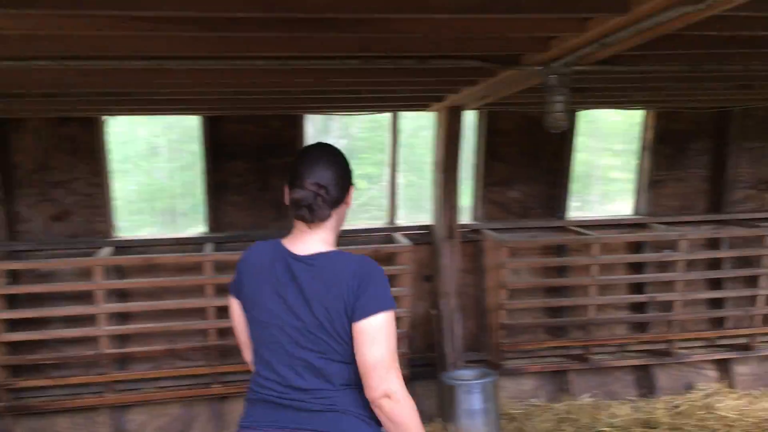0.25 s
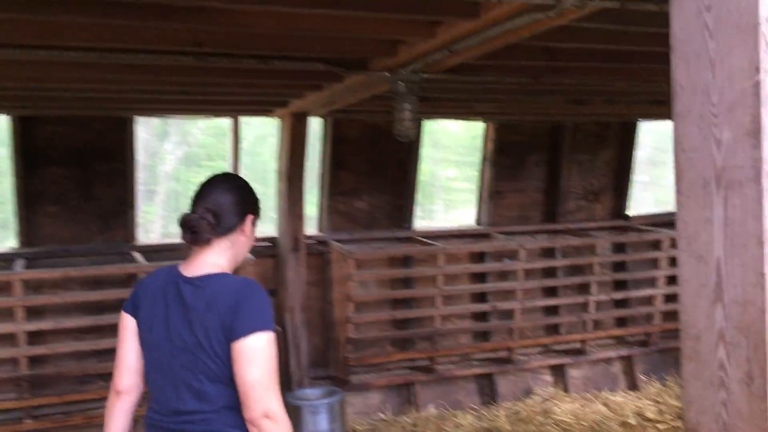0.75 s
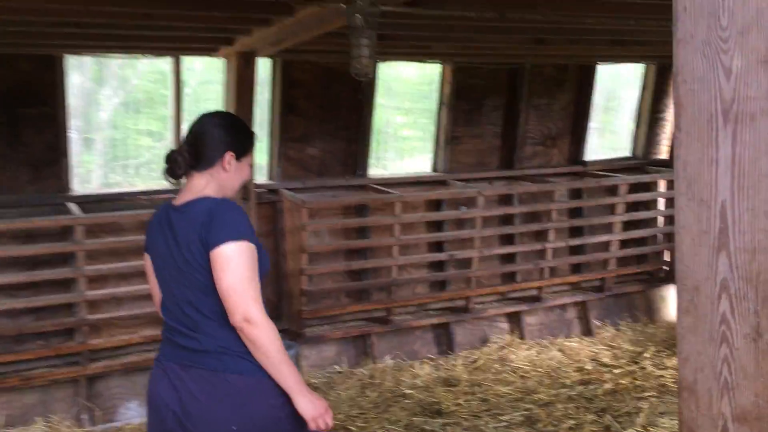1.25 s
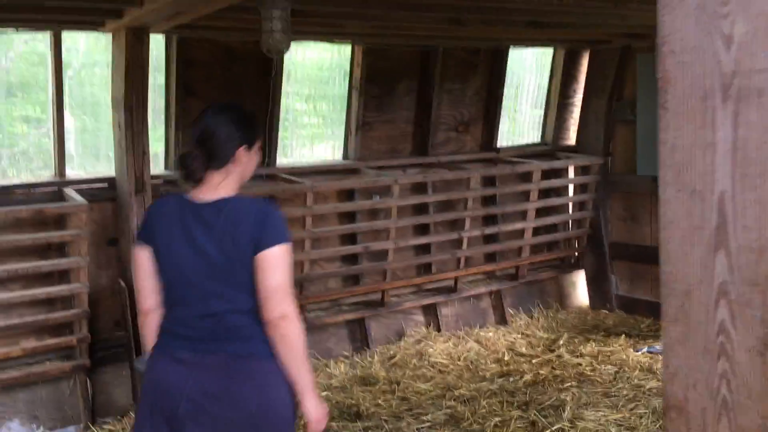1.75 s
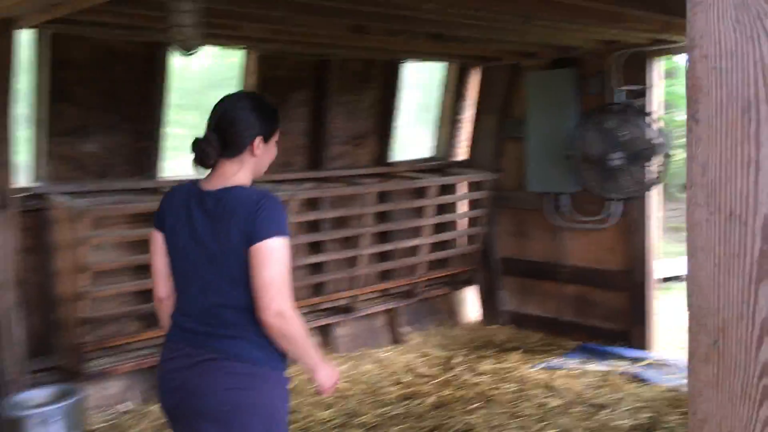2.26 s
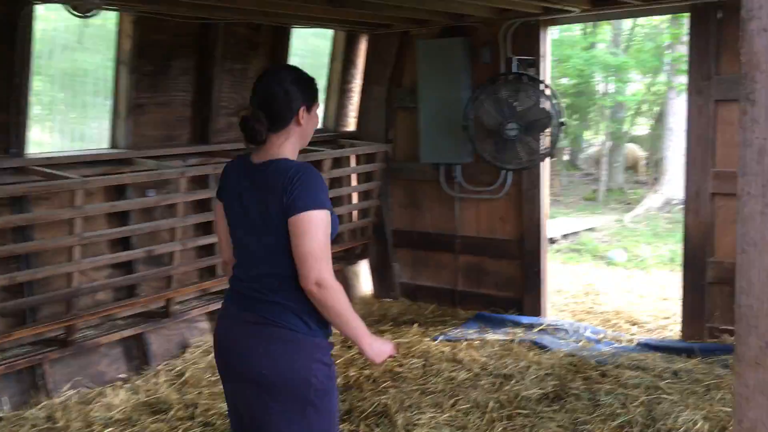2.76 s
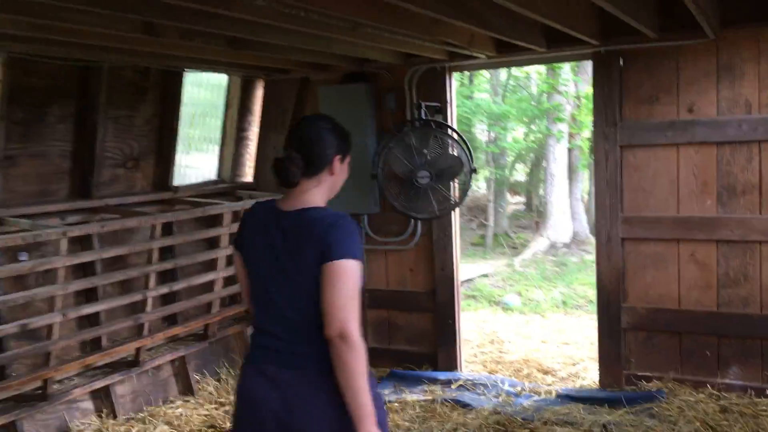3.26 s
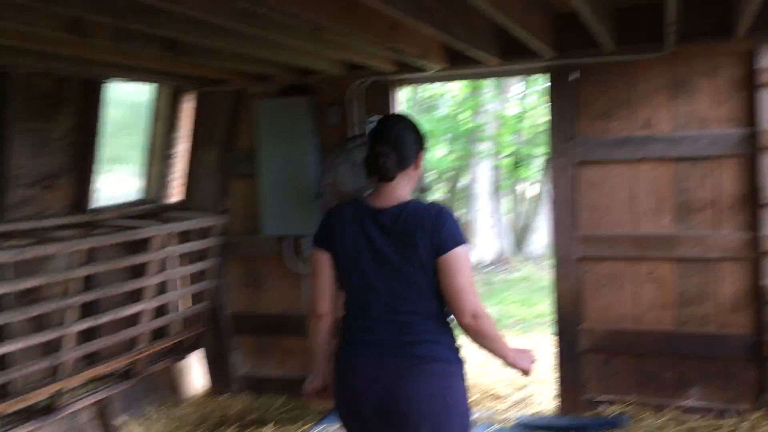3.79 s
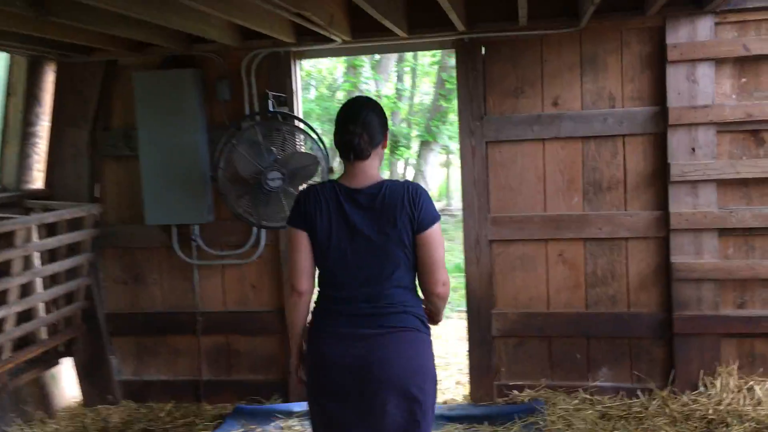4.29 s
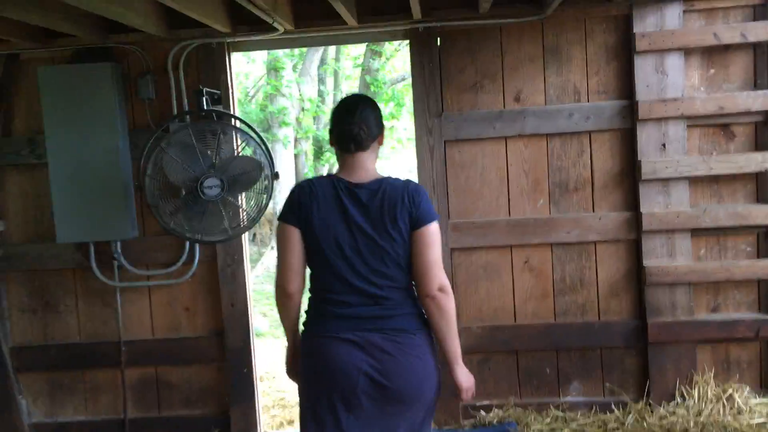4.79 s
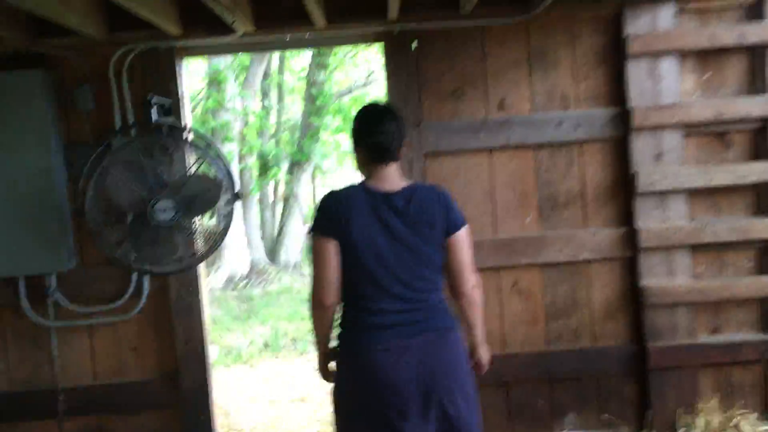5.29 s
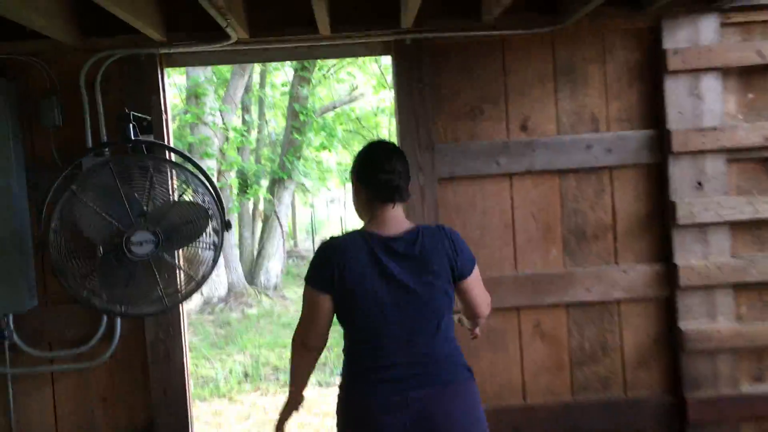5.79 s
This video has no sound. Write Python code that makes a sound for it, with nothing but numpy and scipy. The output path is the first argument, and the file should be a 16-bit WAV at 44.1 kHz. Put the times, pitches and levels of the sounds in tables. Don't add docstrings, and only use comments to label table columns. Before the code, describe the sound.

A handheld microphone is walked through straw toward a large running fan. The low beating hum dominates, gradually slowing, over soft rumble and faint air hiss. Thin metallic guard rattle rises before the middle and then fades. Bright straw swishes come and go, strongest at the start and around three seconds, with crisp stalk snaps and a late dull heel scuff.

```python
import sys
import numpy as np
from scipy import signal
from scipy.fft import rfft, irfft
from scipy.io import wavfile

SR = 44100
rng = np.random.default_rng(int(sys.argv[2]) if len(sys.argv) > 2 else 0)


def generate_wav(signal):
    frames = np.transpose(np.atleast_2d(signal))
    scaled = np.clip(frames, -1, 1) * 32767
    pcm = np.round(scaled).astype(np.int16)
    wavfile.write(sys.argv[1], SR, pcm)


def voltage_ratio(level):
    return 10 ** (np.asarray(level, float) / 20)


N = 266275
TIME_S = np.arange(N) / SR


def unit_rms(x):
    return x / np.sqrt(np.mean(x ** 2) + 1e-20)


def curve(table):
    t_s, value = np.transpose(table)
    return np.interp(TIME_S, t_s, value)


def drift(rate_hz):
    hop = 40
    pole = np.exp(-2 * np.pi * hop * rate_hz / SR)
    noise = rng.standard_normal(N // hop + 2002)
    slow = signal.lfilter([1], [1, -2 * pole, pole ** 2], noise)[2000:]
    return np.interp(np.arange(N) / hop, np.arange(len(slow)), unit_rms(slow))


def coloured(x, spectrum):
    hz, db = np.transpose(spectrum)
    bins_hz = np.arange(N // 2 + 1) * SR / N + 1
    gain = voltage_ratio(np.interp(np.log(bins_hz), np.log(hz), db))
    return unit_rms(irfft(rfft(x) * gain, N))


def bandpass(x, edges_hz):
    return signal.sosfilt(signal.butter(2, edges_hz, "band", fs=SR, output="sos"), x)


def resonance(x, hz, width_hz):
    r = np.exp(-np.pi * width_hz / SR)
    top = [(1 - r * r) / 2, 0, (r * r - 1) / 2]
    return signal.lfilter(top, [1, -2 * r * np.cos(2 * np.pi * hz / SR), r * r], x)


# t/s, turn rate f/Hz
FAN_SPEED = [(0.0, 21.396), (1.0, 21.146), (2.0, 20.824), (2.5, 20.768), (3.0, 20.606), (4.0, 20.039),
             (4.5, 19.844), (5.0, 19.665), (5.5, 19.5), (6.04, 19.464)]


def fan_angle():
    return 4.237 + 2 * np.pi * np.cumsum(curve(FAN_SPEED)) / SR


# extra path/m at start, its rate/(m/s), bend/(m/s^2), share of direct
ECHOES = [(3.156, -1.943, 0.297, 0.146), (5.134, -0.592, 0.136, 1.011), (7.622, -1.836, 0.374, 0.244),
          (9.205, 0.508, 0.143, 0.215), (9.337, 0.89, 0.032, 0.667), (11.54, -3.139, 0.354, 0.181),
          (13.955, 0.286, 0.107, 0.49), (14.803, 0.18, 0.123, 0.43), (16.172, -0.188, 0.138, -0.274),
          (16.557, -1.263, 0.223, 0.558), (16.744, 0.05, 0.063, 0.185), (19.786, -1.871, 0.141, -0.108),
          (21.162, -0.121, -0.083, -0.298), (24.474, -1.575, 0.274, 0.499), (25.239, 1.158, 0.043, -0.843),
          (27.879, -0.139, 0.253, 0.328), (28.074, -1.206, 0.159, -0.211), (29.02, 0.225, 0.147, 0.913),
          (30.504, -0.161, 0.185, 0.929), (31.499, 6.039, -0.511, 0.056), (32.009, -1.054, 0.331, 0.461),
          (32.315, -1.052, 0.276, -0.775), (35.386, -0.507, 0.08, -0.636), (36.825, 0.257, 0.1, -0.954),
          (44.808, 1.66, 0.082, -0.13), (44.98, 0.599, 0.112, -0.901), (45.207, 0.549, 0.126, 0.613),
          (46.31, 0.321, 0.145, -0.99), (46.557, 0.58, 0.2, 0.088), (51.838, -1.117, 0.301, 0.252)]


def barn(order):
    sound_m_per_s = 343
    t_s = np.arange(0, N + 441, 441) / SR
    path_m, speed, bend, share = np.transpose(ECHOES)[:, :, None]
    hz = order * np.interp(t_s, *np.transpose(FAN_SPEED))
    extra_m = path_m + speed * t_s + bend * t_s ** 2
    echoes = share * np.exp(-2j * np.pi * hz * extra_m / sound_m_per_s)
    return np.interp(TIME_S, t_s, 1 + np.sum(echoes, axis=0))


# order, level/dB at start, change/(dB/s)
FAN_ORDERS = [(2.0, -55.7, -0.8), (3.0, -40.6, -5.5), (4.0, -31.1, -1.9), (5.0, -36.1, 2.2),
              (6.0, -50.2, 4.0), (7.0, -38.1, -0.7), (8.0, -59.0, 1.6), (9.0, -62.3, 4.2),
              (10.0, -76.7, 3.4), (11.0, -69.1, 2.9), (12.0, -72.2, 4.0), (13.0, -66.4, 1.6),
              (14.0, -73.7, 3.4), (15.0, -80.4, 0.1), (16.0, -73.0, 1.9)]
# order, level/dB
TOP_ORDERS = [(17, -67), (18, -67), (19, -73), (20, -75), (21, -80)]


def fan_drone(angle):
    in_view_s, hidden_db = 2.75, -7.5
    far_shake, near_shake = .18, .04
    lag_rad, spread_rad, skew_rad = -2.762, 2.634, 1.329
    hidden = 1 / (1 + (TIME_S / in_view_s) ** 5)
    unsteady = near_shake + (far_shake - near_shake) * hidden
    sizes = {}
    for order, db, db_per_s in FAN_ORDERS:
        tilt_db = 0.2 + 0.01 * (order - 6.5)
        sizes[order] = voltage_ratio(tilt_db + db + db_per_s * TIME_S) * barn(order)
    for order, db in TOP_ORDERS:
        sizes[order] = voltage_ratio(db + hidden_db * hidden + 1.8 * drift(.8))
    out = np.zeros(N)
    for order, size in sizes.items():
        shake = unsteady * (order / 5) ** .5 * (drift(7) + 1j * drift(7))
        off = order - 5
        phase = lag_rad + spread_rad * off ** 2 / 2 + skew_rad * off ** 3 / 6
        wave = size * (1 + shake) * np.exp(1j * (order * angle + phase))
        out += np.sqrt(2) * wave.real
    return out * np.minimum(TIME_S / .012, 1)


# t/s, level/dB
RATTLE_LEVEL = [(0, -66.5), (.5, -63), (1, -63.5), (1.4, -63), (1.7, -60.5), (1.95, -58), (2.15, -62),
                (2.42, -57), (2.7, -61.5), (2.87, -61), (3.1, -62.5), (3.5, -64), (3.8, -65), (4.1, -70.5),
                (6.04, -73.5)]
# f/Hz, level/dB
GUARD_SPECTRUM = [(410, 3.5), (450, -9), (580, -10.5), (620, -4), (700, -4), (790, -2), (855, -2.5),
                  (950, -7), (1150, -4), (1400, -8.5)]


def guard_rattle(angle):
    hz, db = np.transpose(GUARD_SPECTRUM)
    turn_hz = np.mean(np.diff(angle[:N // 2])) * SR / (2 * np.pi)
    lines = np.zeros(N)
    for order in range(20, 50):
        size = voltage_ratio(np.interp(order * turn_hz, hz, db) + 3.5 * drift(1.8))
        lines += size * np.cos(order * angle + 1.3 * drift(2.5))
    gate = voltage_ratio(0.94 * np.cos(angle) + 1.9 * np.cos(2 * angle))
    outline = [(300, -8)] + GUARD_SPECTRUM + [(2000, -28)]
    bursts = coloured(gate * rng.standard_normal(N), outline)
    return voltage_ratio(curve(RATTLE_LEVEL)) * unit_rms(unit_rms(lines) + .85 * bursts)


# f/Hz, level/dB
AIR_SPECTRUM = [(260, -0.5), (450, 2), (700, -2.5), (1080, 0), (1850, -22.5), (4000, -14.5), (4850, -14.5),
                (6100, -5), (7700, -14.5), (9500, -12), (10500, -36), (11500, -24), (16500, -22.5)]


def air_hiss():
    return voltage_ratio(-67.5) * coloured(rng.standard_normal(N), AIR_SPECTRUM)


# f/Hz, level/(dB per Hz)
RUMBLE_SPECTRUM = [(30, -23), (50, -14), (70, -9), (95, 0), (135, -2), (160, -9), (200, -13), (260, -18),
                   (330, -24), (450, -33), (600, -45)]


def air_rumble():
    return voltage_ratio(-50.5) * coloured(rng.standard_normal(N), RUMBLE_SPECTRUM)


# t/s, peak level/dB, rise/s, fall/s (over 20 dB)
DRAGS = [(0.153, -53, 0.018, 0.09), (0.192, -55.5, 0.34, 0.57), (0.382, -54.5, 0.12, 0.02),
         (0.713, -57, 0.13, 0.72), (1.108, -59.5, 0.21, 0.12), (1.334, -58.5, 0.086, 0.19),
         (1.506, -60.5, 0.054, 0.2), (1.582, -59.5, 0.04, 0.5), (1.91, -63.5, 0.03, 0.6),
         (2.044, -58.5, 0.11, 0.45), (2.231, -60, 0.14, 0.03), (2.529, -59.5, 0.29, 0.5),
         (3.003, -51, 0.23, 0.27), (3.203, -54, 0.048, 0.08), (3.483, -56.5, 0.48, 0.1),
         (3.582, -58, 0.093, 0.1), (3.753, -55.3, 0.18, 0.13), (3.896, -59.6, 0.6, 0.15),
         (4.1, -58, 0.17, 0.29), (4.459, -58.5, 0.24, 0.67), (4.523, -56, 0.1, 0.25),
         (4.679, -67, 0.018, -0.6), (4.982, -62, 0.014, 0.1), (5.073, -59, 0.022, 0.23),
         (5.256, -60.5, 0.41, 0.56), (5.63, -59.5, 0.051, 0.2), (5.814, -62.5, 0.03, 0.39),
         (5.95, -62, 0.12, 0.05)]


def stirring_db():
    settling_db = -79.5
    power = voltage_ratio(2 * settling_db)
    for t_s, db, rise_s, fall_s in DRAGS:
        side_s = np.maximum(np.where(TIME_S < t_s, rise_s, fall_s), .015)
        power = power + voltage_ratio(2 * db - 40 * ((TIME_S - t_s) / side_s) ** 2)
    return 10 * np.log10(power)


# f/Hz, level/dB
BRIGHT_SPECTRUM = [(3000, -62), (4000, -60), (4900, -2.5), (5600, 3), (6250, 3.5), (7650, 0), (9000, 2),
                   (10100, 1), (10500, -1.5), (11200, 2.5), (14700, 4.5), (16500, -4.5)]


def straw_swish():
    draught_s, draught_width_s, draught_db, lee_db_per_s = 3.16, 1, 3, -0.33
    cracks_per_s = 2500
    swish_db = stirring_db()
    past_s = TIME_S - draught_s
    dull_db = -64.5 + 0.33 * (swish_db + 57.5)
    dull_db += draught_db * np.exp(-(past_s / draught_width_s) ** 2) + lee_db_per_s * past_s
    sizes = voltage_ratio(6.4 * np.minimum(rng.exponential(1, N), 5)) * rng.choice([-1, 1], N)
    struck = rng.random(N) < cracks_per_s * voltage_ratio(4.0 * drift(40)) / SR
    rub = 0.38 * unit_rms(sizes * struck) + voltage_ratio(1.1 * drift(24)) * rng.standard_normal(N)
    dull = unit_rms(bandpass(rub, [1200, 3900]))
    return voltage_ratio(swish_db) * coloured(rub, BRIGHT_SPECTRUM) + voltage_ratio(dull_db) * dull


# t/s, peak level/dB, f/Hz, width/octaves, decay/ms
STALK_SNAPS = [(.1608, -43, 6500, 1.8, .6), (.1688, -42, 6500, 1.8, .6), (.2177, -42, 9000, 2.2, .6),
               (.4907, -48, 1750, .4, 4.0), (.1650, -48, 3200, 1.4, 6.0), (4.06, -54, 1600, .8, 9.0),
               (4.37, -55, 1400, .9, 9.0), (.659, -52, 2700, .5, 3.0), (1.5732, -35.5, 6000, 2.6, .4),
               (3.0375, -40, 12000, 1.5, .8), (5.4912, -33.5, 6000, 2.6, .4),
               (4.6775, -34.5, 14800, .3, .5), (4.9797, -37, 7000, 2.4, .3), (5.0690, -47, 13000, 1.5, 8.0),
               (5.2285, -52, 2600, 1.2, 4.0), (5.3487, -46, 3000, 2.2, .8), (5.4478, -47, 8000, 2.2, .4),
               (5.6255, -47, 1900, .7, 6.0), (5.6262, -44, 3800, 1.6, 5.0), (5.6600, -47, 4200, .8, 5.0)]


def stalk_snaps():
    out, after_s = np.zeros(N), np.arange(900) / SR
    for t_s, db, hz, octaves, decay_ms in STALK_SNAPS:
        edges_hz = np.clip(hz * 2 ** (np.array([-.5, .5]) * octaves), 200, .4 * SR)
        noise = rng.standard_normal(len(after_s))
        push = (.4 * noise - (after_s == 0)) * np.exp(-1000 * after_s / decay_ms)
        crack = bandpass(push, edges_hz)
        start = round(t_s * SR)
        out[start:start + len(after_s)] += voltage_ratio(db) * crack / np.abs(crack).max()
    return out


# t/s, order, peak level/dB, half length/s (over 20 dB)
WIRE_SWELLS = [(1.1, 41, -68, .4), (1.12, 38, -70, .3), (1.4, 41, -70, .4), (1.4, 39, -71, .4),
               (1.75, 40, -68, .6), (1.88, 45, -72, .2), (2.0, 38, -67, .5), (2.0, 36, -68, .3),
               (2.23, 33, -67, .25), (2.45, 36, -66, .3), (2.45, 41, -69, .4), (2.68, 44, -69, .15)]


def singing_wires(angle):
    out = np.zeros(N)
    for t_s, order, db, half_s in WIRE_SWELLS:
        size = voltage_ratio(db - 20 * ((TIME_S - t_s) / half_s) ** 2 + 3.5 * drift(16))
        out += size * np.sqrt(2) * np.cos(order * angle + 1.3 * drift(9))
    return out


# t/s, peak level/dB, f/Hz, ring time/s (60 dB)
HEEL_THUDS = [
    (5.315, -51.5, 530, .12),
    (5.349, -58, 600, .25),
]


def heel_thuds():
    out, after_s = np.zeros(N), np.arange(9000) / SR
    for t_s, db, hz, t60_s in HEEL_THUDS:
        noise = rng.standard_normal(len(after_s))
        mode = np.sin(2 * np.pi * hz * after_s) + .6 * unit_rms(resonance(noise, hz, 200))
        puff = resonance(resonance(noise[::-1], 1.9 * hz, 1300), 1.9 * hz, 2000)
        shape = voltage_ratio(-60 * after_s / t60_s) * (1 - np.exp(-after_s / .004)) * 2
        start = round(t_s * SR)
        out[start:start + len(after_s)] += voltage_ratio(db) * shape * (mode + .6 * unit_rms(puff))
    return out


def scene():
    angle = fan_angle()
    fan = fan_drone(angle) + guard_rattle(angle) + singing_wires(angle)
    air = air_hiss() + air_rumble()
    feet = straw_swish() + stalk_snaps() + heel_thuds()
    return (fan + air + feet)[None]


def band_limit(x):
    return signal.sosfilt(signal.butter(12, 16860, fs=SR, output="sos"), x)


def record(dry):
    top_hz = 15780
    mix = signal.sosfilt(signal.ellip(14, .3, 80, top_hz, fs=SR, output="sos"), dry)
    return band_limit(mix)


dry = scene()
out = record(dry)
generate_wav(out)
```